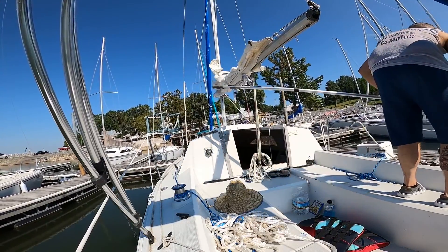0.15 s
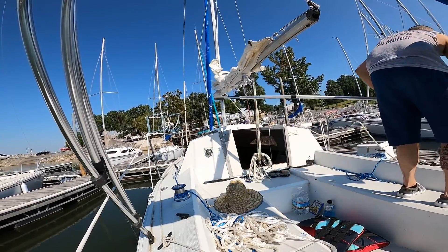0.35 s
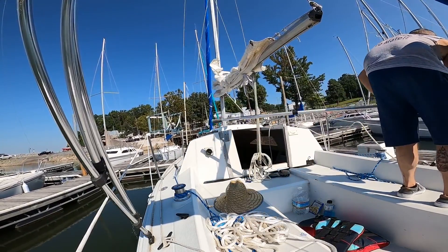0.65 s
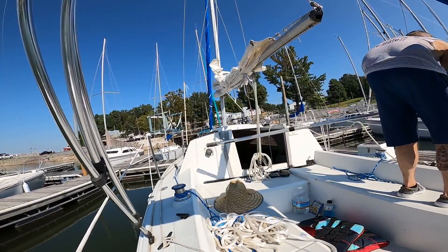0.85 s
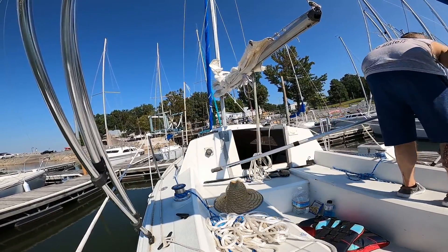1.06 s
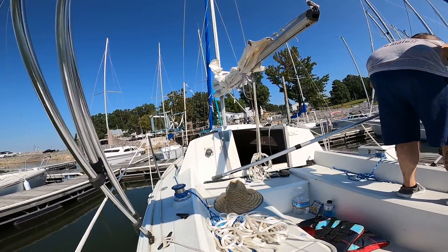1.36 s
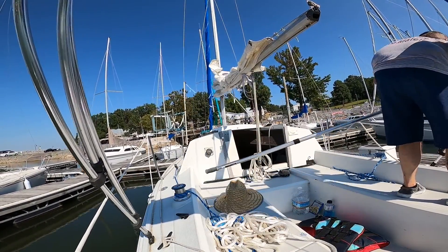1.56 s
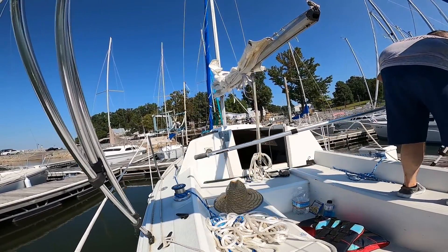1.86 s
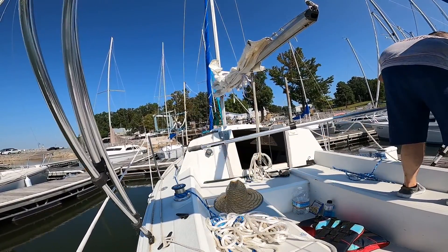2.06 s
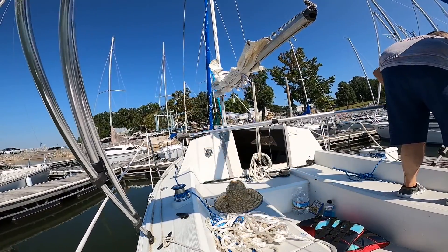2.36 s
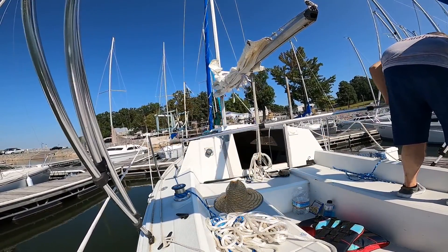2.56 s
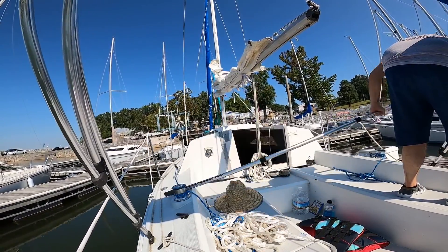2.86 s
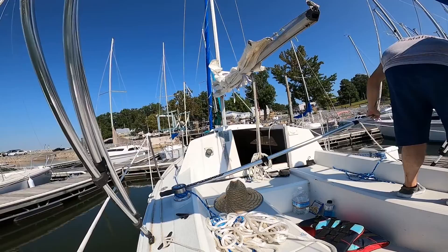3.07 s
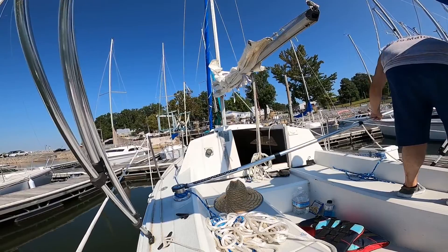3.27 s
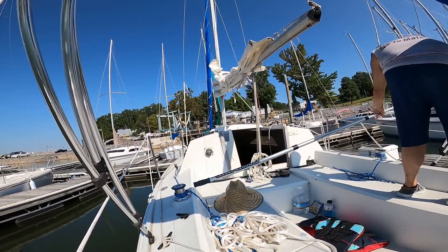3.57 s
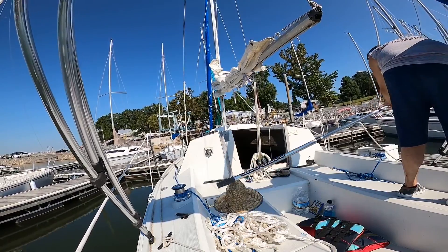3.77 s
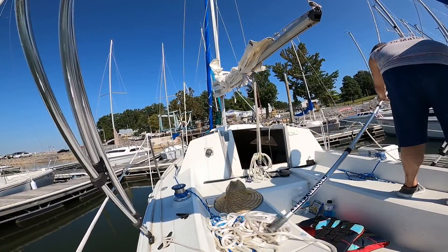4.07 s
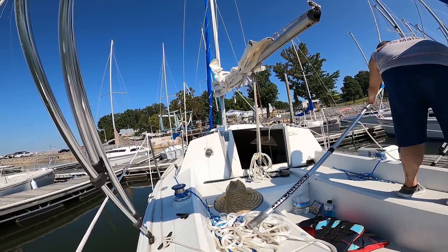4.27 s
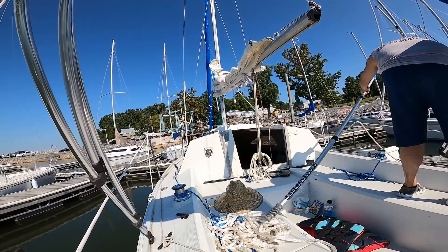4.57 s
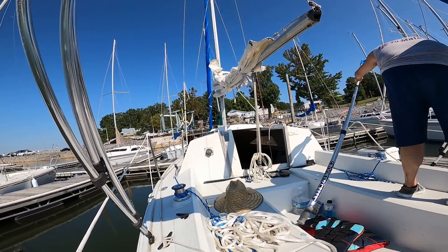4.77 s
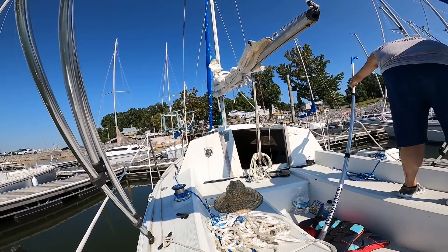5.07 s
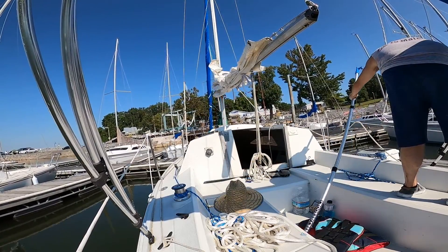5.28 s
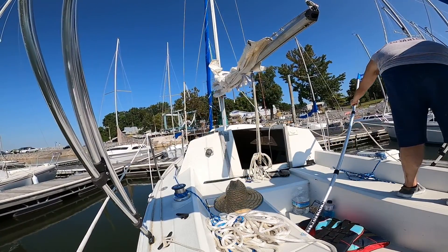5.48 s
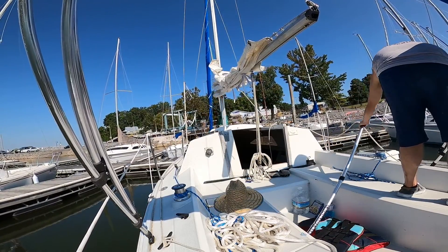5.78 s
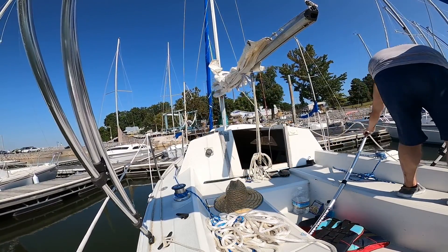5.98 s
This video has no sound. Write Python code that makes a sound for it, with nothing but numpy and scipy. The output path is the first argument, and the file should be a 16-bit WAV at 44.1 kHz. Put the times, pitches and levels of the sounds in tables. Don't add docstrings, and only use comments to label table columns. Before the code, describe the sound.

Open-air marina, calm, heard close on board a moored sailboat through a slightly dull stereo camera microphone. Low wind rumble, lapping murmur, a faint wavering motor hum near 115 Hz, soft far traffic hiss and thin distant bird whistles run throughout. A hollow aluminium pole knocks the hull at 0.3 s and again at 0.7 s, with boomy thuds. At 1.2-1.4 s it tumbles in a quick cluster of clicks and thumps. From 1.4 to 2.9 s it rubs about every 0.13 s, small gritty squeaks, with a sharp knock at 2.45. At 2.99 s comes the loudest event: a hard steel winch clank, high ring near 2.6 kHz, damped at about 3.13 and 3.43. The background then drops slightly. Soft scuffs and drags follow at 4.1-5.3 s, a dull boomy cockpit knock at 5.4, cloth dragging, and a short woody deck drop at 6.08.

```python
import sys
import numpy as np
from scipy import signal
from scipy.fft import rfft, irfft, next_fast_len
from scipy.io import wavfile
from scipy.ndimage import uniform_filter1d

SR = 44100
rng = np.random.default_rng(int(sys.argv[2]) if len(sys.argv) > 2 else 0)


def magnitude_from_level(level_db):
    exponent = np.asarray(level_db, float) / 20
    return 10 ** exponent


def store_pcm(level_fs):
    pcm = np.round(np.clip(level_fs, -1, 1) * 32767).astype(np.int16)
    wavfile.write(sys.argv[1], SR, np.atleast_2d(pcm).T)


N = 270333
TIME = np.arange(N) / SR
FIRM_DB = -19


def unit(x):
    return x / np.sqrt(np.mean(x ** 2, axis=-1, keepdims=True))


def on_log(table, hz):
    f, value = np.transpose(table)
    return np.interp(np.log(hz + 1), np.log(f), value)


def coloured(size, gain):
    hz = np.arange(size // 2 + 1) * SR / size
    return irfft(rfft(rng.standard_normal(size)) * gain(hz), size)


def walk(rate, size=N):
    hold = int(SR / rate)
    levels = np.repeat(rng.standard_normal(size // hold + 2), hold)
    return 1.2 * uniform_filter1d(uniform_filter1d(levels, hold), hold)[:size]


def fade_to(t, at_s, db, width_s):
    return magnitude_from_level(db / (1 + np.exp(np.clip(-(t - at_s) / width_s, -50, 50))))


def ring(modes, length, scatter_db, rise_cycles=0., turn=1):
    t = np.arange(int(length * SR)) / SR
    hz, db, t60 = np.transpose(modes)[:, :, None]
    weight = magnitude_from_level(db + scatter_db * rng.standard_normal(db.shape))
    weight = weight * turn ** np.arange(len(hz))[:, None]
    rise = np.minimum(t * hz / (rise_cycles + 1e-6), 1)
    decay = np.exp(-np.log(1000) * t / t60)
    return (weight * rise * np.sin(2 * np.pi * hz * t) * decay).sum(axis=0)


def add(out, x, s, pan_db=0.):
    i = max(int(s * SR), 0)
    x = x[..., :N - i]
    out[:, i:i + x.shape[-1]] += x * magnitude_from_level(np.array([[pan_db], [-pan_db]]) / 2)


# f/Hz, likeness [0-1]
LIKENESS = [(30, 0.8), (60, 0.95), (100, 1), (300, 0.8), (1000, 0.9), (3000, 0.2), (8000, 0)]


def bed(spectrum, lo_hz, hi_hz, flicker_db, flicker_rate):
    out, size = np.zeros((2, N)), next_fast_len(N)
    f = np.arange(size // 2 + 1) * SR / size
    for hz in lo_hz * 2 ** np.arange(0, np.log2(hi_hz / lo_hz) + .01, .5):
        inside = (f > hz / np.sqrt(2)) & (f < hz * np.sqrt(2))
        shape = magnitude_from_level(on_log(spectrum, f[inside])) * np.cos(np.pi * np.log2(f[inside] / hz))
        like = np.clip(on_log(LIKENESS, hz), 0, 1)
        draws = rng.standard_normal((2, 2, len(shape)))
        chance = np.zeros((2, len(f)), complex)
        chance[:, inside] = shape * (draws[0] + 1j * draws[1])
        mid, side = irfft(chance, size)[:, :N] * np.sqrt([[1 + like], [1 - like]])
        out += magnitude_from_level(flicker_db * walk(flicker_rate)) * np.array([mid + side, mid - side])
    return unit(out)


def background_drop():
    return magnitude_from_level(-5 / (1 + np.exp(-(TIME - 3.234) / .04)))


# t/s, level/dB
GUST = [(0.0, -44.5), (0.53, -48), (1.26, -44.5), (1.6, -49.5), (2.06, -45.5), (2.47, -44), (2.94, -48),
        (3.5, -48.5), (5.2, -45), (5.5, -37.5), (5.8, -43.5), (6.13, -43)]


def gusts():
    return np.interp(TIME, *np.transpose(GUST))


# f/Hz, level/dB per Hz
RUMBLE = [(8.8, -36.5), (15, 2.5), (54, 4.5), (117, -3.5), (142, -10.5), (230, -14.5), (400, -28),
          (650, -59)]


def wind():
    return magnitude_from_level(gusts() + 2.5) * background_drop() * bed(RUMBLE, 16, 92, 2.6, 9)


def tremble():
    shake_db, shake_s = -26, 0.064
    kicks = np.zeros(N)
    for _, blows, *_ in BLOWS:
        for s, db in blows:
            kicks[int(s * SR)] = magnitude_from_level(db + shake_db)
    return signal.lfilter([1], [1, -np.exp(-1 / (shake_s * SR))], kicks)


def murmur():
    gust_db = gusts()
    level = magnitude_from_level(-52 + 0.1 * (gust_db - gust_db.mean())) * background_drop() + tremble()
    return level * bed(RUMBLE, 130, 370, 2.4, 26)


# f/Hz, level/dB per Hz
HISS = [(300, -17), (420, -6), (800, -5.5), (1470, -1), (6000, -21.5), (7060, -26), (8460, -24.5),
        (10200, -47)]


def traffic():
    level = magnitude_from_level(-56.5) * background_drop() + magnitude_from_level(-28.5) * tremble()
    return level * bed(HISS, 484, 12000, 0.61, 28)


# f/Hz, level/dB
TOP_HISS = [(9000, 1), (12500, -6), (14000, -20)]


def top_hiss():
    return magnitude_from_level(-87) * background_drop() ** 3.2 * bed(TOP_HISS, 8800, 13600, 5.5, 12.1)


# t/s, level/dB
HUM = [
    (0.0, -47.5),
    (0.48, -52.5),
    (1.02, -41),
    (1.69, -56),
    (2.99, -45.5),
    (4.97, -53.5),
    (5.39, -47),
    (5.94, -55),
    (6.13, -38),
]


def motor():
    hum_db = np.interp(TIME, *np.transpose(HUM))
    hz = 114.5 + 1.5 * walk(6.6)
    tone = np.sin(2 * np.pi * np.cumsum(hz) / SR) * magnitude_from_level(1.1 * walk(7.6))
    blur = unit(coloured(N + 3, lambda f: 1 / (1 + ((f - 114) / 9) ** 2))[:N])
    return magnitude_from_level(hum_db) * (0.96 * tone + 0.29 * blur)


# start t/s, length t/s, start f/Hz, level/dB
HELD = [(0, 0.18, 7640, -70.5), (.08, 0.13, 5900, -76), (.56, 0.3, 7300, -79), (.72, 0.3, 6000, -67),
        (.85, 0.22, 8870, -72.5), (1.3, .25, 7700, -78), (1.55, 0.28, 6160, -72), (1.5, .25, 7800, -83),
        (2.055, 0.14, 3880, -68), (2.28, .16, 7100, -74), (2.2, 0.25, 6570, -77), (2.2, .2, 7560, -77),
        (2.55, .2, 8650, -78.5), (2.62, 0.25, 7450, -76), (2.8, 0.14, 3940, -68), (3.37, 0.18, 6640, -76),
        (4.17, .12, 6800, -72), (4.17, 0.088, 4780, -77), (4.26, 0.1, 4820, -75), (4.58, .12, 6000, -81.5)]
RISING = [(.1, 0.37, 8170, -73.5), (.42, 0.11, 6800, -74), (.9, 0.2, 7460, -75), (1.02, 0.31, 8340, -69.5),
          (3.2, 0.34, 7700, -86), (3.47, 0.23, 7260, -79.5), (3.7, 0.32, 7650, -82),
          (3.83, 0.14, 5830, -77.5), (4.84, 0.18, 8280, -79.5)]
CLIMBING = [(3.96, 0.17, 4194, -71.5)]
SWOOPING = [(1.7, 0.4, 8760, -77), (5.44, 0.43, 8980, -79.5)]
FALLING = [(2.76, 0.21, 3855, -64), (3.65, 0.27, 4247, -72.5)]
CHATTER = [(0, .55, 7940, -79), (1.25, 0.88, 8000, -76), (2.2, .7, 7500, -79), (3.03, 0.18, 8510, -75.5),
           (4.17, .1, 6280, -74), (4.6, 0.19, 8620, -80), (5.62, 0.41, 3700, -74), (5.82, .13, 5000, -74)]
# calls, glide [Hz per s], blur width f/Hz
BIRDS = [
    (HELD, -120, 190),
    (RISING, 1100, 250),
    (CLIMBING, 3700, 180),
    (SWOOPING, -1700, 320),
    (FALLING, -4000, 380),
    (CHATTER, 120, 960),
]


def whistles(out):
    all_calls = [(*call, *kind) for calls, *kind in BIRDS for call in calls]
    for start, length, hz, db, glide_hz, width_hz in all_calls:
        size = int(length * SR)
        pitch = hz + glide_hz * TIME[:size] + 45 * walk(22, size=size)
        glide = np.exp(2j * np.pi * np.cumsum(pitch) / SR)
        blur = [unit(coloured(size, lambda f: 1 / (1 + (2 * f / width_hz) ** 2))) for _ in range(4)]
        swell = magnitude_from_level(db + 2.1 * walk(20, size=size)) * np.sin(np.pi * np.arange(size) / size) ** .5
        mid = (glide * (blur[0] + 1j * blur[1])).real
        side = 0.18 * (glide * (blur[2] + 1j * blur[3])).real
        add(out, swell * np.array([mid + side, mid - side]), start)


# start t/s, length t/s, level/dB, brightness [dB per octave]
SLIPS = [(0.098, 0.095, -82, 7), (0.355, 0.23, -80, 3), (0.775, 0.19, -68.5, 4), (1.02, .09, -83, 6),
         (1.205, 0.18, -60.5, -1), (2.972, 0.02, -34, -4), (2.976, .008, -52, 3), (3.009, 0.13, -60.5, -3),
         (3.06, .016, -60, 1), (3.404, 0.082, -74, 0), (4.117, 0.15, -61.5, -4), (4.519, 0.5, -67, 0),
         (5.164, 0.07, -48, 0), (5.212, 0.053, -49, -2), (5.261, 0.11, -60.5, -1.5),
         (4.421, 0.034, -70.5, -2), (5.518, 0.7, -71.5, 1.5), (6.066, .012, -50, -4)]
# end t/s, length t/s, level/dB, squeak f/Hz
RUBS = [(1.438, 0.055, -58.5, 2870), (1.59, 0.038, -55.5, 6260), (1.73, 0.073, -53.5, 4380),
        (1.852, 0.029, -57, 4100), (1.992, 0.063, -57.5, 4100), (2.127, 0.049, -58.5, 4070),
        (2.264, .05, -54, 4100), (2.4, 0.044, -61.5, 4100), (2.532, .04, -56, 4240),
        (2.656, 0.032, -62.5, 4100), (2.795, 0.038, -58, 4100), (2.923, 0.017, -65.5, 4140)]
# f/Hz, level/dB per Hz
DRAG = [(180, -22), (300, 3.5), (538, -11), (1250, -1.5), (3650, -9), (7220, -23), (8910, -28),
        (14500, -44.5)]
RUSTLE = [(300, -14.5), (1200, 2), (2500, -4), (4100, -3), (8000, -13.5), (9500, -22), (12800, -24.5),
          (14500, -43)]
# multiple of its squeak [ratio], level/dB
SQUEAK = [(.78, -4), (1, 0.5), (1.23, -4.5), (1.5, -6)]


def slips(out):
    rubs = [(end - length, length, db, 0.67 * (-58.5 - db), hz) for end, length, db, hz in RUBS]
    for s, length, db, tilt_db, *squeak in SLIPS + rubs:
        size = int(length * SR) + 400
        colour, grit_db = (DRAG, 1.6) if s > 4.5 else (RUSTLE, 2.6)

        def friction(f):
            peaks = 1
            for hz in squeak:
                for ratio, peak_db in SQUEAK:
                    peaks = peaks + magnitude_from_level(6.5 + peak_db) / (1 + ((f - ratio * hz) / 79) ** 2)
            return peaks * magnitude_from_level(on_log(colour, f)) * (f / 3000 + 1e-6) ** (0.25 + tilt_db / 6)

        hiss = unit(coloured(size, friction))
        grit = magnitude_from_level(grit_db * rng.standard_normal(size // 90 + 1))
        grain = uniform_filter1d(np.repeat(grit, 90)[:size], size=40)
        n = np.arange(size)
        edge = np.minimum(n / (200 + 0.14 * size), n[::-1] / (200 + 0.3 * size))
        add(out, magnitude_from_level(db + 0.68 * walk(25, size=size)) * hiss * grain * np.minimum(edge, 1), s, .8)


# f/Hz, level/dB, t60 t/s
CABIN = [(45.7, -22, 0.7), (88.5, -6.5, 0.35), (92, -8.5, 0.17), (121.9, 2, 0.17), (192, -5, 0.19),
         (228.6, -1, 0.27), (355, -14, 0.13), (554, -38, .07)]
COAMING = [(69.6, -10.5, 0.21), (87.8, -9, .25), (105, -8.5, 0.33), (111, -6.5, 0.2), (185, -9, 0.081),
           (208, -3.5, 0.19), (243, 1, 0.064), (290, -4, 0.12), (345, -9.5, 0.073), (428, -13.5, 0.13),
           (540, -9.5, 0.046), (620, -8, .06), (744, -8.5, 0.077)]
COCKPIT = [(61.8, -10, 0.29), (80.5, -2.5, 0.25), (112, -0.5, 0.3), (150.8, -4, 0.17), (198.6, 1, 0.08),
           (240, -8, 0.12), (297.7, -11.5, 0.13), (345, -1, 0.18), (421, -12, 0.12), (578, -11, 0.11),
           (660, -13, 0.1)]
TRANSOM = [(56.3, -7, 0.3), (86, 1, 0.2), (104, 1, 0.14), (200, -6, 0.12), (232, -6, 0.15),
           (368, -11, 0.06), (660, -5, .06)]
LOCKER = [(90, -0.5, 0.099), (155.1, -1.5, 0.1), (194, -5.5, 0.06), (244, 3, 0.097), (340, -4, 0.1),
          (398.5, -5, 0.12), (480, -6.5, .07), (596, 1, 0.07), (760, -6.5, .05), (960, -3, .07)]
# (t/s, level/dB)
BLOWS = [
    (CABIN, [(.295, -31.5), (.33, -39), (.49, -42.5), (.737, -30.5), (.751, -31.5), (.8, -36), (.9, -41.5), (.96, -30.5), (1.8, -37.5), (2.03, -39), (2.1, -36), (2.463, -30), (2.49, -36), (3.27, -38), (3.48, -38.5), (4.865, -34)], 3.6, (.79, -1)),
    (TRANSOM, [(1.2, -38.5), (1.213, -24), (1.229, -24.5), (1.241, -20.5), (1.263, -28), (1.28, -29.5), (1.291, -24.5), (1.314, -33), (1.354, -33.5), (1.395, -36.5)], 2.5, (1.342, -6)),
    (COAMING, [(2.98, -35.5), (2.9925, -11.5), (3.004, -19), (3.016, -25.5), (3.029, -23.5), (3.048, -24), (3.075, -33.5), (3.108, -34.5), (3.13, -37)], 1.4, (3.06, -11.5)),
    (COCKPIT, [(5.402, -26.5), (5.409, -16), (5.42, -24.5), (5.429, -25.5), (5.474, -32), (5.492, -31.5), (5.545, -39)], 2.6, (5.461, -12.5)),
    (LOCKER, [(4.15, -36), (4.19, -36), (6.079, -21.5), (6.084, -27.5), (6.088, -23), (6.092, -26), (6.099, -21), (6.108, -25.5), (6.113, -31)], 1.64, (6.121, -5.5)),
    ([(255, -6, 0.11), (340, -3.5, 0.086), (447, -0.5, 0.082), (620, 1, .06), (786, -1, .06)], [(.03, -50.5), (.46, -49), (.77, -46.5), (.83, -48.5), (.88, -51.5), (.938, -47), (1.272, -38), (1.313, -42), (1.97, -52.5), (2.33, -50.5), (4.12, -53.5)], 0.29, (1.33, -2)),
]


def thuds(out):
    t = np.arange(int(.5 * SR)) / SR
    dense = lambda f: f / 60 / (1 + (f / 60) ** 2) / (1 + (f / 300) ** 2)
    crowd_fade = np.exp(-t / 0.072) * np.minimum(t / 0.00083, 1)
    jolt_fade = np.exp(-t / .1) * np.minimum(t / .01, 1)
    for panel, blows, firm_ms, (rest_s, rest_db) in BLOWS:
        for s, db in blows:
            contact_ms = firm_ms * magnitude_from_level(0.45 * (FIRM_DB - db))
            push = np.hanning(int(contact_ms * SR / 1000) + 3)
            crowd = unit(coloured(len(t), dense)) * crowd_fade
            unlike = unit(coloured(len(t), dense)) * crowd_fade
            thud = ring(panel, .5, scatter_db=2.0) + .28 * crowd + 0.1 * np.array([unlike, -unlike])
            thud = signal.lfilter(*signal.butter(2, 56.6, "high", fs=SR), thud)
            jolt = unit(coloured(len(t), lambda f: f / (1 + (f / 35.97) ** 4))) * jolt_fade
            thud = thud + magnitude_from_level(-14) * np.array([jolt, -.6 * jolt])
            thud = signal.lfilter(push / push.sum(), 1, thud)
            damping = fade_to(t, rest_s - s, rest_db, 0.0026) if s < rest_s else 1
            add(out, magnitude_from_level(db) * thud * damping, s)


# f/Hz, level/dB, t60 t/s
WINCH_RING = [(2635, -2.5, 0.72), (2624, -9.5, 0.24), (3640, -29, 0.6), (3670, -29.5, .5), (3745, -28, 0.3),
              (3860, -24.5, .1), (7420, -8, 0.14), (7460, -10.5, 0.075), (4875, -29, 0.096),
              (8790, -28.5, .09), (6350, -37, .3), (6700, -28, .08), (12000, -22, .06)]


def clank(out):
    t = np.arange(SR) / SR
    drum = ring(WINCH_RING, 1, scatter_db=0) * (1 - 0.5 * np.exp(-t / 0.0057))
    first_db = -8.5 / (1 + np.exp(-(t - .14) / 0.0033))
    second_db = -12 / (1 + np.exp(-(t - .44) / 0.014))
    add(out, magnitude_from_level(-21.5) * drum * magnitude_from_level(first_db + second_db), 2.99, .5)
    crack = unit(coloured(len(t), lambda f: 1 / (1 + ((f - 12500) / 2200) ** 2))) * np.exp(-t / .002)
    add(out, magnitude_from_level(-35.5) * crack, 2.9895, -1.5)
    skid_s = 0.036
    t = t[:int(skid_s * SR)]
    squeal = unit(coloured(len(t), lambda f: 1 / (1 + ((f - 7940) / 45) ** 2)))
    add(out, magnitude_from_level(-43 - 18 * (1.5 - t / skid_s)) * np.minimum(t / .003, 1) * squeal, 2.989 - skid_s)


# f/Hz, width f/Hz, level/dB
POLE_LONG = [(1077, 110, -2), (1224, 81, -2.5), (1397, 15, 2.5), (1564, 185, -3.5), (1876, 57, -6.5),
             (2237, 23, -1.5), (2385, 92, -5.5), (3100, 97, -20), (4740, 280, -22), (5230, 270, -28),
             (6000, 320, -22), (7700, 250, -39), (10700, 370, -42)]
POLE_MID = [(1040, 45, 3), (1220, 130, 4), (1448, 310, -5), (1750, 75, 0), (2020, 84, -11), (2290, 54, -1),
            (2870, 210, -7), (3700, 160, -24), (5000, 500, -18), (6040, 380, -17.5), (7900, 600, -31),
            (10900, 280, -38)]
POLE_SHORT = [(798, 31, -2), (1134, 38, -3.5), (1255, 41, 4), (1550, 34, -5), (2138, 65, 1.5),
              (2360, 98, -13), (2846, 94, -4.5), (3340, 120, -10.5), (4070, 79, -28), (4940, 100, -16),
              (5320, 66, -20), (6070, 350, -20), (7700, 1000, -27.5), (10760, 85, -35)]
WINCH_BODY = [(660, 160, -2), (1097, 45, 4), (1300, 35, -17), (1670, 120, -14.5), (1820, 29, -8),
              (1970, 39, -15), (2635, 41, -6.5), (3070, 90, -10), (3460, 130, -9), (4100, 250, -13.5),
              (4926, 120, -13.5), (5680, 330, -18.5), (7820, 170, -12.5), (8760, 300, -14)]
DECK = [(643.5, 200, 0), (980, 54, -3), (1293, 16, 7), (1940, 61, -4.5), (2720, 130, -11.5),
        (2940, 67, -12), (3320, 74, -13), (4680, 420, -14.5), (8650, 150, -39.5)]
FITTING = [(1190, 1400, 12.5), (2520, 1100, -8.5), (3640, 1700, 4.5), (5680, 970, -2.5), (7740, 1000, -9),
           (12500, 1100, -32.5)]
SOLE = [(695, 300, -6.5), (1035, 74, -0.5), (1220, 170, -6), (1980, 120, -5), (3430, 850, -13.5),
        (6000, 2300, -57)]
COVER = [(750, 100, -1), (1247, 125, 0.5), (1796, 480, -11), (3080, 95, -35), (5670, 110, -41)]
# f/Hz, level/dB, t60 t/s
POLE_RING = [(10450, -6, 0.36), (10870, -5, 0.07)]
# resonances, touches (t/s, peak level/dB), tail level/dB, left minus right level/dB,
# damping [factor], rattle t/s, build-up [cycles]
CONTACTS = [
    (POLE_LONG, [(0.281, -17), (0.327, -23), (0.342, -34)], -12.5, .5, 1.8, 0.014, 3.6),
    (POLE_MID, [(0.719, -15.5)], -11.5, 1, 1.94, 0.0091, 2.2),
    (COVER, [(.738, -40), (.753, -44), (1.195, -28), (1.199, -28), (1.208, -36.5), (3.098, -42)], -9, 1.1, 0.94, 0.019, 5.1),
    (POLE_SHORT, [(1.217, -33), (1.2645, -28), (1.437, -43.5), (1.709, -33), (2.443, -14), (2.4545, -28.5), (2.477, -29.5)], -12.5, 0.35, 1.6, 0.01, 3.6),
    (FITTING, [(1.2141, -20.5), (1.2345, -36), (1.2385, -32), (1.2506, -26), (1.3059, -35.5), (1.3149, -35.5), (1.4022, -39.5), (3.028, -45), (4.1205, -48.5), (5.172, -46.5), (5.436, -46), (5.46, -46)], -7.5, 0.98, 0.85, 0.0033, 2.2),
    (WINCH_BODY, [(2.9895, -1.5), (2.9955, -18.5), (2.979, -40), (1.4, -56)], -13.5, -2, 1.4, 0.0058, 3.1),
    (SOLE, [(5.4, -39.5), (5.406, -29), (5.419, -40.5), (5.433, -48), (5.458, -50)], -5.5, -1.5, 0.76, 0.0091, 2),
    (DECK, [(6.077, -20), (6.081, -35)], -0.76, -3.1, 2.5, 0.0061, 1.8),
]


def contacts(out):
    t = np.arange(int(.25 * SR)) / SR
    deck_colour = lambda f: f / 350 / (1 + (f / 350) ** 2) / (1 + (f / 1600) ** 2)
    for part, hits, firm_tail_db, pan_db, damping, rattle_s, build in CONTACTS:
        hz, width, db = np.transpose(part)
        t60 = np.log(1000) / np.pi / (damping * width)
        modes = np.transpose([hz, db - 20 * np.log10(t60), t60])

        def rattle_colour(f):
            power = sum(magnitude_from_level(d) ** 2 / (1 + ((f - c) / (3.0 * w)) ** 2) ** 2 for c, w, d in part)
            return np.sqrt(power) / (1 + (f / 2200) ** 2) ** 0.24

        for s, peak_db in hits:
            tail_db = firm_tail_db + 0.2207 * (FIRM_DB - peak_db)
            body = ring(modes, .25, scatter_db=2.0, rise_cycles=build, turn=-1.0)
            body = body * fade_to(t, .0038, -9, .0006)
            rattle = unit(coloured(len(t), rattle_colour))
            rattle = rattle * np.minimum(t / 0.0047, 1) * np.exp(-t / rattle_s)
            deck = unit(coloured(len(t), deck_colour))
            deck = 0.28 * deck * np.minimum(t / 0.0064, 1) * np.exp(-t / 0.034)
            knock = body / np.abs(body).max() + magnitude_from_level(tail_db) * (rattle + deck)
            add(out, magnitude_from_level(peak_db + 2) * knock, s, pan_db)
            if part in (POLE_LONG, POLE_MID, POLE_SHORT):
                ring_db = peak_db - 44.5 - 8 * (part == POLE_SHORT)
                flutter = magnitude_from_level(8.2 * walk(400, size=len(t)))
                add(out, magnitude_from_level(ring_db) * ring(POLE_RING, .25, scatter_db=3) * flutter, s)


def reflections(hits):
    t = np.arange(int(.12 * SR)) / SR
    echo = rng.standard_normal((2, len(t))) * np.exp(-t / 0.0063) * np.minimum(t / 0.012, 1)
    echo = echo / np.sqrt((echo ** 2).sum(axis=1, keepdims=True))
    echo = signal.lfilter([1, -1], [1, -.93], echo)
    echo = signal.lfilter([.35], [1, -.7], echo)
    return magnitude_from_level(-15.0) * signal.fftconvolve(hits, echo, axes=1)[:, :N]


def scene():
    hits = np.zeros((2, N))
    for source in (slips, thuds, clank, contacts):
        source(hits)
    out = wind() + murmur() + traffic() + top_hiss() + motor()
    whistles(out)
    return out + hits + reflections(hits)


def low_pass(x):
    return signal.sosfilt(signal.butter(12, 15540, fs=SR, output="sos"), x)


# f/Hz, phase [radians]
PORT_PHASE = [(30, 0.017), (300, -0.22), (2150, -0.6), (4130, -.9), (6000, -1.2), (8000, -1.1),
              (12000, -1.1)]
# f/Hz, level/dB
PORT_BALANCE = [(60, 1), (110, 0.5), (380, -0.8), (1290, 0), (2370, 2.5), (4380, 1.5), (8090, -0.5),
                (14900, -1)]


def record(dry):
    size = next_fast_len(N + 4096)
    hz = np.arange(size // 2 + 1) * SR / size
    half = magnitude_from_level(on_log(PORT_BALANCE, hz) / 2) * np.exp(.5j * on_log(PORT_PHASE, hz))
    squashed = np.tanh(0.89 * dry) / 0.87
    padded = np.pad(squashed, ((0, 0), (0, size - N)), "reflect")
    ports = irfft(rfft(padded) * np.array([half, 1 / half]), size)[:, :N]
    ports = signal.lfilter(*signal.butter(3, 12600, fs=SR), ports)
    mix = signal.sosfilt(signal.ellip(8, .2, 70, 15400, fs=SR, output="sos"), ports)
    return low_pass(mix)


dry = scene()
out = record(dry)
store_pcm(out)
```